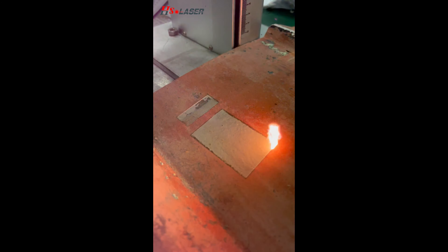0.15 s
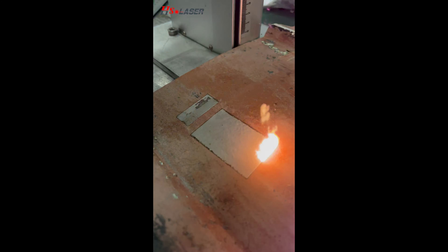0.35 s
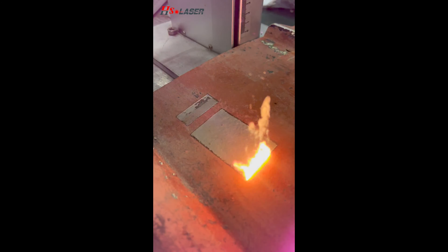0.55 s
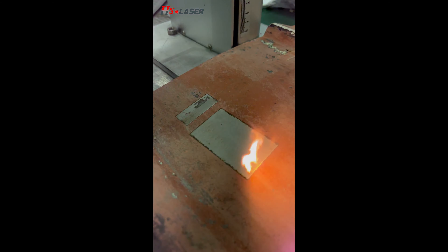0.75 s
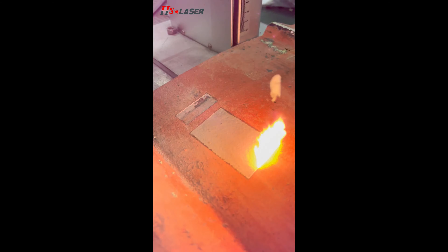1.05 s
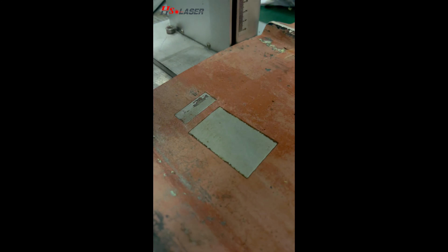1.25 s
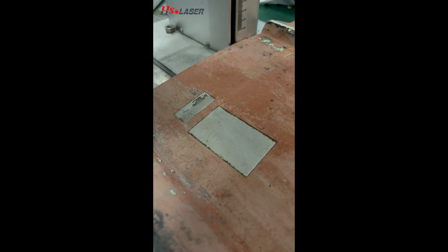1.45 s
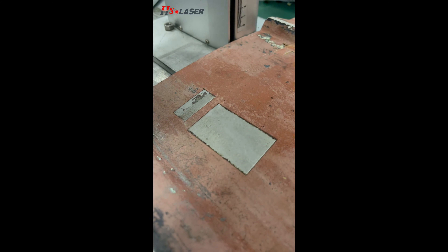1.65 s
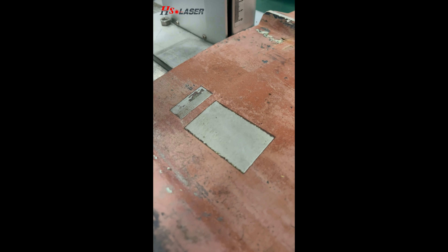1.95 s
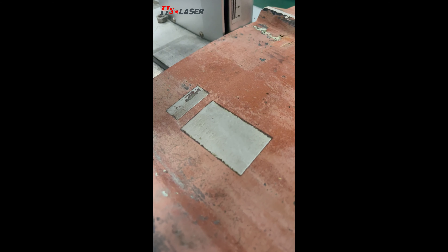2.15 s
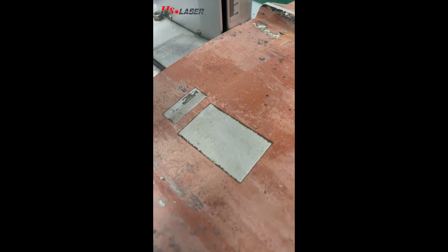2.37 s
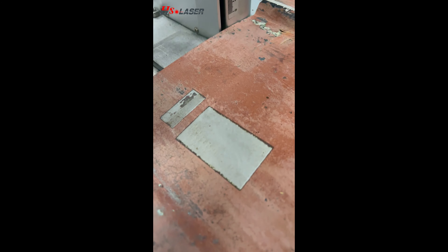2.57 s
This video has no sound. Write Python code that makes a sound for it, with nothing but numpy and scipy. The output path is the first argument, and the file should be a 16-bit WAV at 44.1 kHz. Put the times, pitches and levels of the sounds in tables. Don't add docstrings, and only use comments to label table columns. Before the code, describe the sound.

Harsh buzzing from a laser stripping paint, fast pops, sizzles and cracks with metallic ring, recorded close in stereo in a small reverberant shop; abrupt stop, then steady fans toward the right, their bass gradually returning.

```python
import sys
import numpy as np
from scipy import signal
from scipy.fft import rfft, irfft, next_fast_len
from scipy.io import wavfile
from scipy.ndimage import uniform_filter1d, map_coordinates

SR = 44100
rng = np.random.default_rng(int(sys.argv[2]) if len(sys.argv) > 2 else 0)


def to_linear_factor(level_db):
    exponent = np.asarray(level_db, float) / 20
    return 10 ** exponent


def wrap_up_sound(samples):
    columns = np.atleast_2d(samples).T
    tamed = np.clip(columns, -1, 1)
    steps = np.round(tamed * 32767).astype(np.int16)
    wavfile.write(sys.argv[1], SR, steps)


N = 119511
M = next_fast_len(N, True)
BINS_HZ = np.arange(M // 2 + 1) * SR / M

CYCLE_HZ, STOP_S = 28.965, 1.1805
PERIOD_MS = 1000 / CYCLE_HZ
ALIKE, LOW_ALIKE, LOW_LAG_MS = .72, .45, -.15
RIGHT = to_linear_factor(np.array([[-2.1], [2.1]]))


def laser(t):
    return room(pops() + sizzle(t) + spits(t)) + vapour_thrust(t)


# time_in_cycle_ms, level_db, sign, right_port_lag_ms
POPS = [
    (4.65, -1, 1, -.25),
    (14.98, -3, -1, -.28),
    (21.8, -3, 1, -.07),
    (32.6, -4.5, -1, -.16),
]
# pitch_hz, level_db, t60_s
PLATE_MODES = [(413, -4.5, 0.037), (524, -4, 0.02), (785, -3.5, 0.03), (991, 3.5, 0.019), (1100, -1, 0.022),
               (1500, 0, 0.005), (1870, 1.5, 0.0093)]


def pops():
    kicks = 0
    for at_ms, level_db, sign, lag_ms in POPS:
        start_s = np.arange(at_ms / 1000, STOP_S, 1 / CYCLE_HZ)
        kick = np.zeros(N)
        scatter_db = 1.2 * rng.standard_normal(len(start_s))
        kick[(start_s * SR).astype(int)] = sign * to_linear_factor(level_db + scatter_db)
        kicks = kicks + np.array([kick, late(kick, lag_ms)])
    u = np.arange(1500) / SR
    ring = 0
    for hz, level_db, t60_s in PLATE_MODES:
        ring = ring + to_linear_factor(level_db) * np.sin(2 * np.pi * hz * u) * np.exp(-np.log(1000) * u / t60_s)
    ringing = signal.fftconvolve(kicks, ring[None])[:, :N]
    return to_linear_factor(-29) * unit(shape(ringing, low_cut(310, 6)))


# start_ms, length_ms, level_db, change_along_line_db
BURNING_LINES = [
    (14.69, 8.6, 1, -3),
    (32.1, 7.9, 2, -1),
]
# pitch_hz, level_db per Hz
SIZZLE_SPECTRUM = [(150, -0.5), (350, -18), (750, -4), (1000, 0), (1500, -1), (2200, -2), (4000, -15.5),
                   (16000, -41)]


def sizzle(t):
    burn = 0
    for start_ms, length_ms, level_db, change_db in BURNING_LINES:
        along = ((t * 1000 - start_ms) % PERIOD_MS) / length_ms
        level = to_linear_factor(level_db + change_db * np.minimum(along, 1))
        burn = burn + level * (along < 1) * (t < STOP_S)
    repeat = 0.65
    comb = 1 / (1 - repeat * np.exp(-2j * np.pi * BINS_HZ / CYCLE_HZ))
    paint = shape(ports(LOW_ALIKE, LOW_LAG_MS), comb)
    return to_linear_factor(-29) * unit(colour(paint * burn * grains(), SIZZLE_SPECTRUM))


# time_in_cycle_ms, dull_level_db, bright_level_db, rise_ms, fade_ms
SPITS = [
    (.8, 0, -3, 1.1, .9),
    (3.5, -1, -2.5, 1, .8),
    (4.9, 4, 3.5, .4, 1),
    (15.15, 1, -3.5, .5, .6),
    (15.9, -5, -11, .3, 2.5),
    (22.2, -5, 0, 1.3, .8),
    (23.4, -10, -1.5, .5, .9),
    (24.9, -18, -7, .5, .7),
    (32.75, -3, -5, .6, .7),
    (33.7, -3, -12, .5, .8),
]
# pitch_hz, level_db per Hz
DULL_SPECTRUM = [(900, 3), (1900, 7.5), (2600, 6.5), (4000, 6.5), (5500, -16), (7000, -21)]
# pitch_hz, level_db per Hz
CRACK_SPECTRUM = [(3000, -12), (5000, -2), (6500, -0.5), (8500, -2.5), (10500, -3.5), (13000, -5),
                  (14700, -9), (16000, -2)]


def spits(t):
    ms = t * 1000 % PERIOD_MS
    dull, bright = 0, 0
    for at_ms, dull_db, bright_db, rise_ms, fade_ms in SPITS:
        turn = np.minimum(np.round((t - at_ms / 1000) * CYCLE_HZ).astype(int) + 1, 39)
        swell = np.exp(-((ms - at_ms) % PERIOD_MS) / fade_ms)
        swell = swell + np.exp(-((at_ms - ms) % PERIOD_MS) / rise_ms)
        swell = swell * to_linear_factor(1.1 * rng.standard_normal(40)[turn]) * (t < STOP_S)
        dull = dull + to_linear_factor(dull_db) * swell
        bright = bright + to_linear_factor(bright_db) * swell
    grain = grains()
    dull_noise = colour(ports(LOW_ALIKE, LOW_LAG_MS) * grain * dull, DULL_SPECTRUM)
    crack_noise = colour(ports(ALIKE) * grain * bright, CRACK_SPECTRUM)
    return to_linear_factor(-32.5) * unit(dull_noise) + to_linear_factor(-29) * unit(crack_noise)


def vapour_thrust(t):
    ms = t * 1000 % PERIOD_MS
    puffed_ms, thumped_ms = (ms + 1) % (PERIOD_MS / 2), (ms - 1.5) % (PERIOD_MS / 2)
    puff = np.sin(np.pi * np.minimum(puffed_ms / 5.5, 1)) ** 2
    thump = np.sin(2 * np.pi * 231 * thumped_ms / 1000) * np.exp(-thumped_ms / 10)
    fade_s = 0.022
    fade = np.exp(-np.maximum(t - STOP_S, 0) / fade_s)
    return (to_linear_factor(-28) * (puff - puff.mean()) + to_linear_factor(-31) * thump) * fade


def grains():
    held = to_linear_factor(1.7 * rng.exponential(size=(2, N // 20 + 1)))
    return held.repeat(20, axis=1)[:, :N]


def room(x):
    t60_s, level_db = 0.089, -11.5
    u = np.arange(SR // 3) / SR
    tail = rng.standard_normal((2, len(u))) * np.exp(-np.log(1000) * u / t60_s) * (u > .002)
    tail = signal.lfilter([1], [1, -.55], tail)
    tail = tail / np.sqrt(np.sum(tail ** 2) / 2)
    return x + to_linear_factor(level_db) * signal.fftconvolve(x, tail, axes=1)[:, :N]


# start_s, level_db
TICKS = [
    (1.575, -34),
    (1.643, -44),
]


def cooling_ticks(t):
    decay_s, fade = .003, 0
    for start_s, level_db in TICKS:
        fade = fade + to_linear_factor(level_db) * np.exp(-np.clip(t - start_s, 0, 1) / decay_s) * (t > start_s)
    return ports(ALIKE) * fade


# time_s, pitch_hz, width_hz, level_db
HOWL = [(1.45, 835, 120, -62), (1.58, 757, 150.1, -42), (1.75, 640.3, 200.3, -36.5),
        (1.9, 430, 120.3, -37.5), (2.0, 258.1, 80, -36.5), (2.06, 185.3, 35.9, -30),
        (2.3, 170.7, 40.04, -31), (2.42, 130, 29.77, -31), (2.6, 125, 30, -45)]


def duct_howl(t):
    time_s, *columns = np.array(HOWL).T
    hz, width_hz, level_db = (np.interp(t, time_s, column) for column in columns)
    place = np.cumsum(width_hz) / SR
    wander = rng.standard_normal((2, 1000))
    re, im = (map_coordinates(row, [place], mode="mirror") for row in wander)
    phase = 2 * np.pi * np.cumsum(hz) / SR
    return to_linear_factor(level_db) * (t > time_s[0]) * (re * np.cos(phase) + im * np.sin(phase))


# pitch_hz, level_db per Hz
AIR_SPECTRUM = [(24, -48), (40, -5.5), (297, -5), (329, -9), (358, -5.5), (664, -3), (830, -3),
                (1650, -4.5), (2400, -19.5), (3120, -56), (5280, -120)]
# pitch_hz, level_db per Hz
HISS_SPECTRUM = [(1800, -36), (2400, 5), (4000, -3), (5500, -1.5), (8000, -5), (12000, -11), (13800, -14.5),
                 (15900, -11)]
# pitch_hz, level_db per Hz
RUMBLE_SPECTRUM = [(40, -30), (80, -4.5), (140, 1), (200, -0.5), (300, -3), (450, -2.5), (850, -6.5),
                   (1600, -17.5)]
# time_s, level_db
PHONE_GAIN = [(1.2, 3.5), (1.4, 1.5), (1.9, 1), (2.2, 2.5), (2.7, 7)]
# time_s, level_db
PHONE_BASS = [(1.4, -18), (1.52, -11), (1.62, -7.5), (1.8, -5), (1.95, -1), (2.198, -1.5), (2.7, 1.5)]


def fans(t):
    hiss_alike = 0.985 - 0.54 * (BINS_HZ < 5000)
    air = RIGHT * to_linear_factor(-37) * colour(ports(.8, 0.029), AIR_SPECTRUM)
    air = air + to_linear_factor(-48) * colour(ports(hiss_alike), HISS_SPECTRUM)
    air = air * to_linear_factor(np.interp(t, *np.array(PHONE_GAIN).T))
    deep = RIGHT * to_linear_factor(-24.5) * colour(ports(1.0, 0), RUMBLE_SPECTRUM)
    octave = np.clip(np.log2(BINS_HZ / 120 + 1e-9), 0, 5)
    swell_db, out = 1.76 * walk(9.1), 0
    for k in range(6):
        late_s = 0.086 * np.clip(3 - k, 0, 2)
        bass_db = np.interp(t - late_s, *np.array(PHONE_BASS).T)
        air_band, deep_band = shape(np.array([air, deep]), np.clip(1 - abs(octave - k), 0, 1))
        out = out + to_linear_factor(swell_db + 0.35 * walk(46)) * (air_band + to_linear_factor(bass_db) * deep_band)
    return out


def ports(alike, lag_ms=.244):
    a, b = rng.standard_normal((2, N))
    bend_hz = 10300
    bend = .17 * np.maximum(BINS_HZ - bend_hz, 0) ** 2 / bend_hz * 1.5
    turns = (BINS_HZ - bend) * lag_ms / 1000
    shared = shape(a, alike * np.exp(-2j * np.pi * turns))
    return np.array([a, shared + shape(b, np.sqrt(1 - alike * alike))])


def walk(rate_hz):
    k = int(SR / rate_hz)
    w = uniform_filter1d(uniform_filter1d(rng.standard_normal(N), k), k)
    return w / w.std()


def unit(x):
    return x / np.sqrt(np.mean(x[..., :int(STOP_S * SR)] ** 2))


def colour(x, spectrum):
    hz, db = np.array(spectrum, float).T
    level_db = np.interp(np.log(BINS_HZ + 1), np.log(hz), db, left=-70, right=-70)
    y = shape(x, to_linear_factor(level_db))
    return y / np.sqrt(np.mean(y ** 2))


def late(x, ms):
    return shape(x, np.exp(-2j * np.pi * BINS_HZ * ms / 1000))


def low_cut(hz, order):
    return 1 / (1 + (hz / (BINS_HZ + 1)) ** order)


def shape(x, gain):
    return irfft(rfft(x, M) * gain, M)[..., :N]


def scene():
    t = np.arange(N) / SR
    return laser(t) + cooling_ticks(t) + RIGHT * duct_howl(t) + fans(t)


def low_pass(x):
    return signal.sosfilt(signal.butter(12, 15940, fs=SR, output="sos"), x)


def record(dry):
    ring_hz, width_hz = 5030, 380
    dry = dry + to_linear_factor(-1) * signal.lfilter(*signal.iirpeak(ring_hz, ring_hz / width_hz, fs=SR), dry)
    dry = shape(dry, (BINS_HZ < 15850) * low_cut(48, 6))
    mid, side = (dry[0] + dry[1]) / 2, (dry[0] - dry[1]) / 2
    high_side = shape(side, low_cut(800, 12))
    low_side_db = np.where(np.arange(N) < STOP_S * SR, -19, -50)
    side = high_side + to_linear_factor(low_side_db) * (side - high_side)
    return low_pass(np.array([mid + side, mid - side]))


dry = scene()
out = record(dry)
wrap_up_sound(out)
```